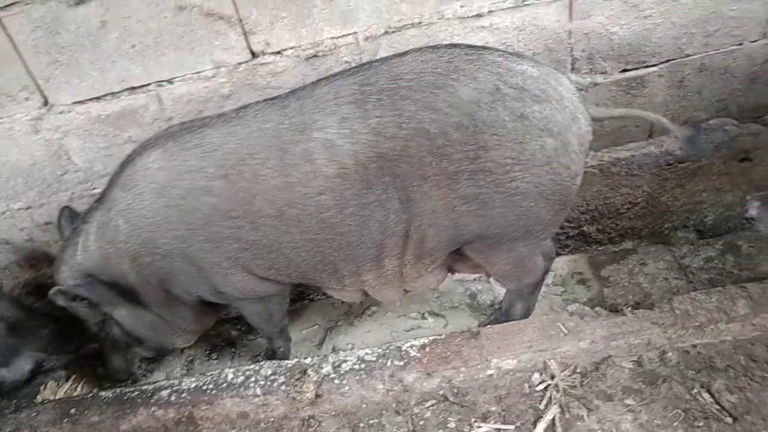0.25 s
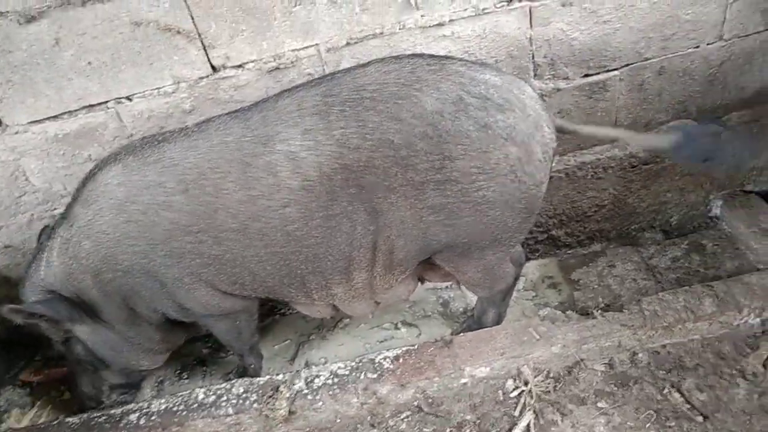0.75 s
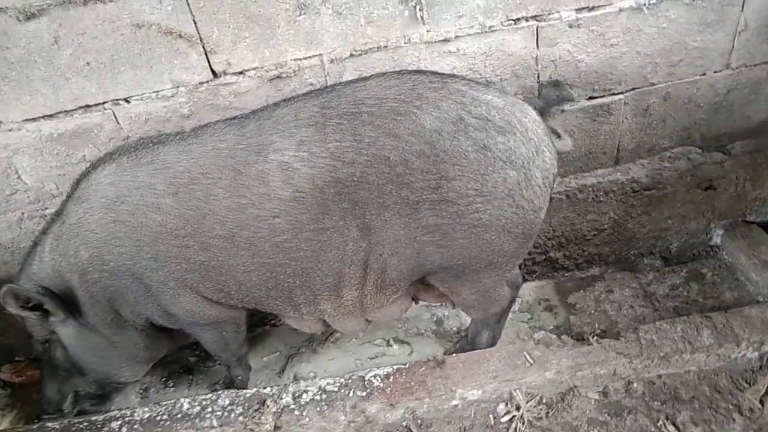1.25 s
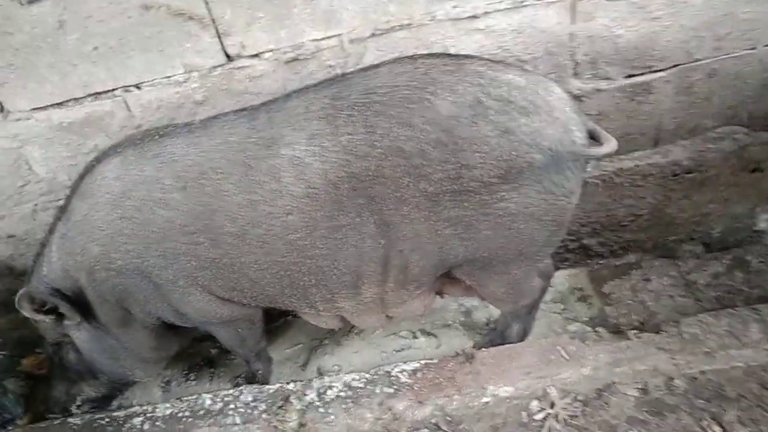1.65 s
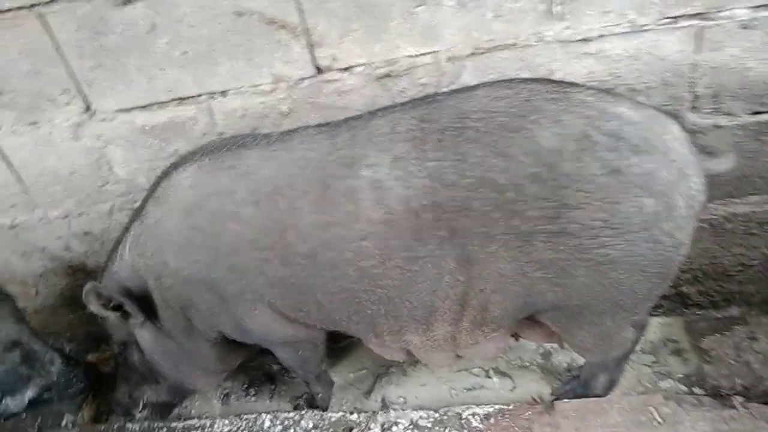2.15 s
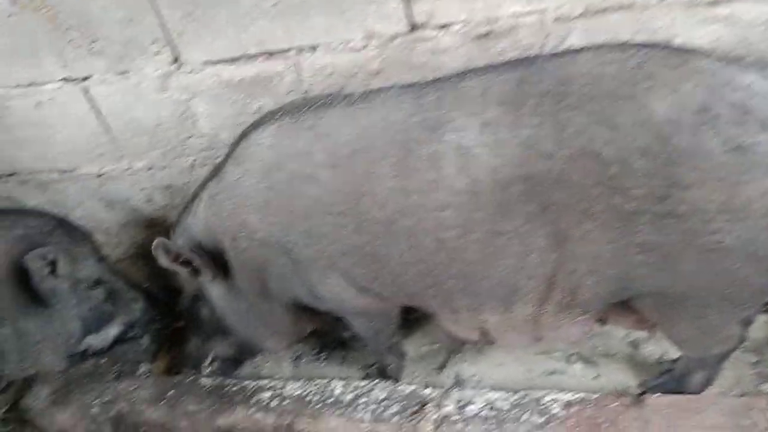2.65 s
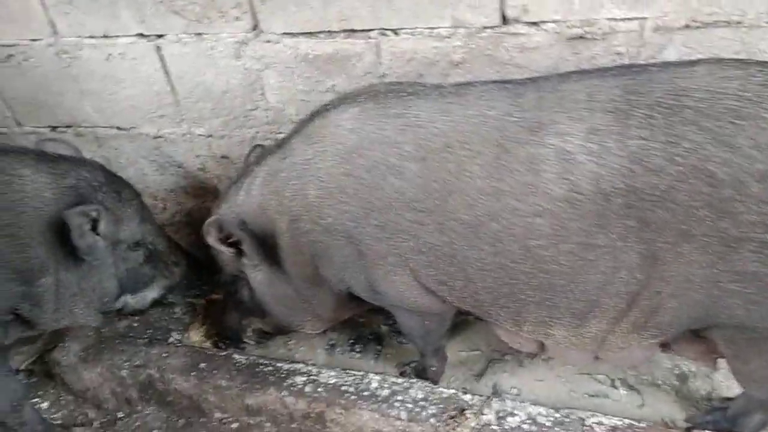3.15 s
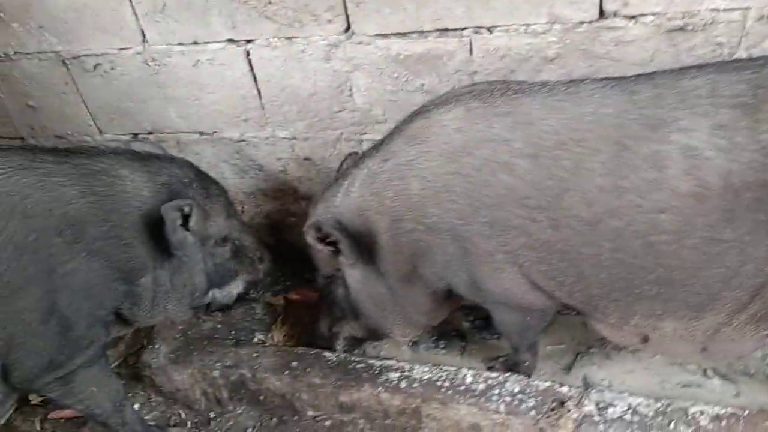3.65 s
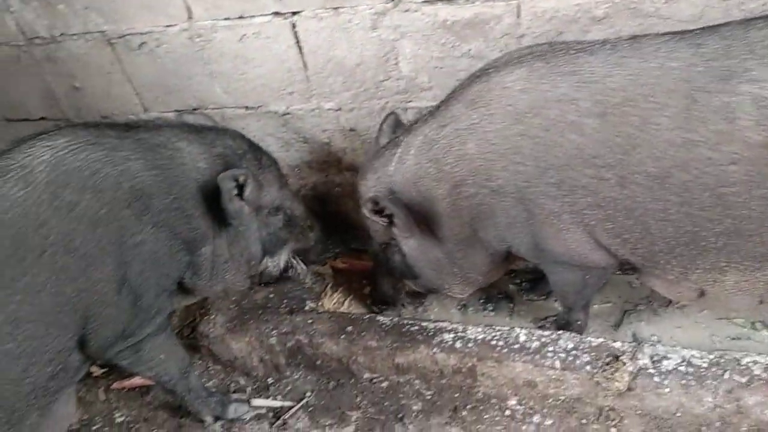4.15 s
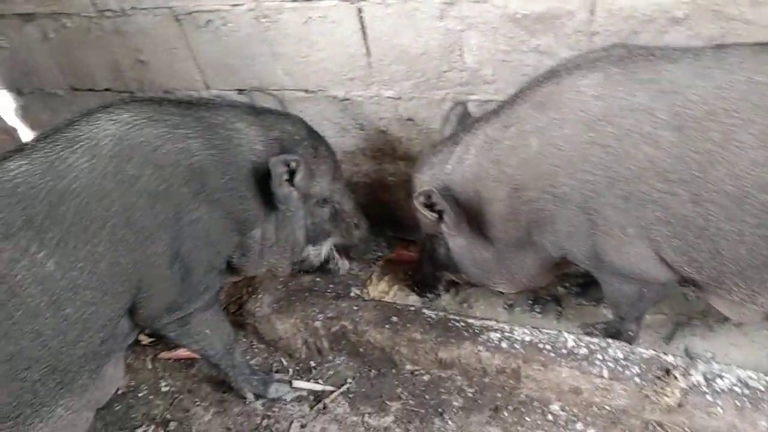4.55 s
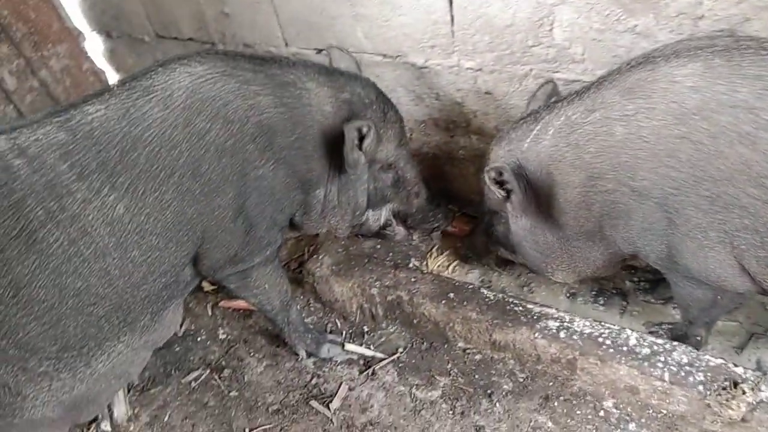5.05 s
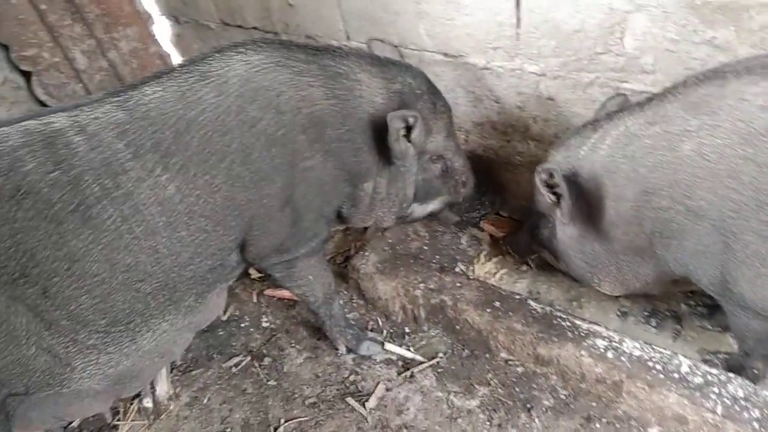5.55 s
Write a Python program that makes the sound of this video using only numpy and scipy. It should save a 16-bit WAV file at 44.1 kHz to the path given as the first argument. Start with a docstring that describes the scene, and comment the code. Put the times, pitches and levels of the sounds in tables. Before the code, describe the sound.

Wet chomps, lip smacks and slurps come steadily from two pigs eating mash, with a few dry clicks and knocks late on.

```python
"""Two pigs chew wet feed from a concrete trough, about three mouthfuls a second.
Bursting films and bubbles make the mash crackle, squelch and slosh; parting lips excite the mouth's
cavity resonance, juice squeaks between the teeth, slurps sink in pitch and air pockets plop.
The block walls of the pen reverberate briefly over a quiet yard. Late on, dry clicks and a few
knocks sound close by."""
import sys
import numpy as np
from scipy import signal
from scipy.fft import rfft, irfft, next_fast_len
from scipy.io import wavfile
from scipy.ndimage import uniform_filter1d

SR = 44100
rng = np.random.default_rng(int(sys.argv[2]) if len(sys.argv) > 2 else 0)


def inscribe(sig):
    """Save sig as 16-bit PCM at rate SR to the path in sys.argv[1].

    A 1-D sig is mono; a 2-D sig holds one channel per row.
    Samples are clipped to [-1, 1] before scaling.
    """
    pcm = np.round(np.clip(np.atleast_2d(sig).T, -1, 1) * 32767)
    wavfile.write(sys.argv[1], SR, pcm.astype(np.int16))


N = 256030
TIME = np.arange(N) / SR

# jaw strokes: (time [s], length [s], crackle level [dB], squelch level [dB], slosh level [dB],
# spray level [dB], mouth resonance [Hz])
JAW_STROKES = [(0, 0.099, -44.5, -86, -77, -53, 2260), (.11, 0.071, -38.5, -53.5, -70, -42.5, 2500),
               (0.226, 0.048, -38.5, -54.5, -59.5, -41.5, 3350),
               (0.411, 0.13, -37.5, -45, -60, -37.5, 2380), (0.651, 0.051, -38.5, -57, -69, -47, 1800),
               (0.703, 0.17, -41, -46.5, -51.5, -43.5, 3000), (0.9, 0.11, -36.5, -46, -69, -45.5, 2240),
               (1.08, 0.041, -39, -50, -54, -53.5, 1970), (1.156, 0.13, -42, -45.5, -76, -46, 2700),
               (1.331, 0.028, -36.5, -43.5, -62, -45.5, 2330), (1.377, 0.14, -44, -44, -49.5, -44, 2730),
               (1.619, 0.069, -48, -72, -70, -52.5, 3030), (1.659, .05, -40.5, -45, -56.5, -52, 2600),
               (1.8, 0.062, -54.5, -63, -70, -76, 2940), (1.9, 0.09, -41, -44.5, -62, -43.5, 3220),
               (2.004, 0.026, -37.5, -44.5, -67, -49, 1960), (2.122, 0.094, -36, -42.5, -47.5, -40, 2400),
               (2.269, 0.054, -43.5, -49.5, -64, -71, 2450), (2.365, 0.058, -42, -45.5, -67, -48, 2700),
               (2.449, 0.073, -41, -45, -79, -47, 2540), (2.576, 0.054, -31.5, -40, -43.5, -37, 2600),
               (2.647, 0.16, -56, -45, -57, -43, 2300), (2.824, 0.071, -38, -43, -45, -40.5, 2370),
               (2.941, 0.13, -39, -48.5, -55.5, -46, 2500), (3.065, 0.17, -44, -46, -52.5, -42, 2870),
               (3.341, 0.077, -38.5, -40.5, -44, -52.5, 1900), (3.397, 0.093, -45, -43, -44, -42.5, 2220),
               (3.496, 0.028, -34, -41.5, -61, -38, 2960), (3.64, 0.046, -44, -85, -82, -53, 2900),
               (3.669, 0.1, -44, -45, -43.5, -41.5, 2920), (3.798, 0.013, -35, -42, -48.5, -41.5, 3260),
               (3.951, 0.061, -38, -42.5, -47.5, -36.5, 3100),
               (4.072, 0.052, -49.5, -57.5, -53.5, -47.5, 2640),
               (4.216, 0.076, -43.5, -50, -49.5, -49, 2820), (4.276, 0.16, -40.5, -44.5, -51, -42.5, 2430),
               (4.534, .09, -39, -42.5, -58.5, -43, 2450), (4.632, 0.14, -41, -48, -86, -49.5, 2500),
               (4.806, 0.16, -42.5, -46, -46.5, -46.5, 2300), (5.109, 0.024, -38.5, -45, -62, -62, 2620),
               (5.125, 0.059, -35, -38.5, -45.5, -40, 2220), (5.216, 0.044, -41, -44, -41.5, -62, 2050),
               (5.325, 0.037, -55, -49, -44.5, -65, 2000), (5.404, .09, -41.5, -42, -43.5, -49, 2050),
               (5.53, 0.024, -40, -44.5, -45, -51, 2460), (5.58, 0.11, -42.5, -44.5, -81, -61, 1930),
               (5.705, 0.064, -40, -41, -47, -48, 2080)]
# spectrum of fine spray: (frequency [Hz], relative level [dB])
SPRAY_SPECTRUM = [(2500, -21), (4300, -5.5), (5300, -2.5), (6600, -4.5), (8000, -7), (10300, -11.5),
                  (11800, -21), (16000, -24)]


def amp(db):
    """Amplitude ratio of a level in decibels."""
    return 10 ** (np.asarray(db) / 20)


def unit(x):
    """Normalisation to rms 1."""
    return x / np.sqrt(np.mean(x ** 2) + 1e-20)


def burst(x, span_s=.032):
    """Energy normalisation: a transient gets the energy of rms 1 held for span_s."""
    return x / np.linalg.norm(x) * np.sqrt(span_s * SR)


def along(points, hz):
    """Interpolation of (frequency [Hz], value) points on a logarithmic frequency axis."""
    frequencies, values = np.transpose(points)
    return np.interp(np.log(hz + 1), np.log(frequencies), values)


def add(track, start_s, x):
    """Superposition of x on the track from start_s."""
    start = max(round(start_s * SR), 0)
    track[start:start + len(x)] += x[:max(N - start, 0)]


def coloured(x, spectrum, size=4096):
    """Minimum-phase filtering: folding the cepstrum gives a causal response with this spectrum."""
    gain = amp(along(spectrum, np.fft.rfftfreq(size, 1 / SR)))
    cepstrum = irfft(np.log(gain))
    cepstrum[1:size // 2] *= 2
    cepstrum[size // 2 + 1:] = 0
    response = irfft(np.exp(rfft(cepstrum)))
    return signal.fftconvolve(x, response)[:len(x)]


def resonance(x, hz, q):
    """Forced response of a second-order resonator with peak gain 1."""
    return signal.lfilter(*signal.iirpeak(hz, q, SR), x)


def yard():
    """Ambient noise: a faint, stationary random signal with a shaped spectrum."""
    # background spectrum: (frequency [Hz], relative level [dB])
    spectrum = [(20, -6), (40, 4), (54, 12.5), (75, 5.5), (180, -12.5), (310, -23), (450, 14), (1000, -30),
                (2500, -3.5), (5000, 6.5), (9000, -11.5), (16000, -13)]
    return amp(-62) * unit(coloured(rng.standard_normal(N), spectrum))


def pen_reverberation(x, segments=24, delay_s=.004):
    """Diffuse reflection from close walls; a fresh tail for each segment stands for the moving heads."""
    # decay in the pen: (frequency [Hz], reverberation time T60 [s])
    decay_times = [(150, 0.26), (320, 0.27), (550, 0.28), (2500, 0.33), (7000, 0.15), (15000, 0.097)]
    out = np.zeros(N)
    for k in range(segments):
        hz, t, noise = signal.stft(rng.standard_normal(SR // 3), SR, nperseg=256)
        decay = amp(-60 * t / along(decay_times, hz)[:, None])
        tail = signal.istft(noise * decay, SR, nperseg=256)[1]
        start, end = k * N // segments, (k + 1) * N // segments
        add(out, start / SR + delay_s, signal.fftconvolve(x[start:end], tail / np.linalg.norm(tail)))
    return out


def clicks(snap_hz=1000, db_per_octave=17, edge_hz=7000, knock_hz=394, thump_hz=150):
    """Impact excitation of damped modes: a one-cycle snap with a bright edge, a knock, a dull thump."""
    # close contacts: (time [s], snap gain [dB], knock gain [dB])
    contacts = [(4.2027, -23, -47), (4.2288, -26, -41), (4.336, -26, -38), (4.3656, -16, -46),
                (4.3916, -15, -50), (4.4245, -14.5, -50), (4.5328, -15, -52), (4.8254, -14, -51),
                (4.8372, -21, -26.5), (4.8498, -18.5, -29), (4.8598, -19, -50), (4.8734, -17, -33),
                (4.8915, -21.5, -31), (4.9315, -14, -25.5), (4.9727, -14.5, -36), (5.2845, -7.5, -11),
                (5.3289, -9.5, -18.5), (5.5003, -10.5, -19.5)]
    out, t = np.zeros(N), np.arange(SR // 25) / SR
    ring = lambda hz, life: np.sin(2 * np.pi * hz * t) * np.exp(-t / life)
    highpass = signal.butter(2, 260, "high", fs=SR)
    knock = ring(knock_hz, .0031) * (1 - np.exp(-t / .0018))
    thump = amp(-19) * ring(thump_hz, .01)
    for start, snap_db, knock_db in contacts:
        # lighter contacts are briefer and higher
        hz = min(snap_hz * 2 ** (-snap_db / db_per_octave), SR / 4)
        snap = amp(snap_db) * ring(hz * np.exp(.1 * rng.standard_normal()), .65 / hz)
        # harder contacts gain body, while their bright edge stays about the same
        edge = min(2 * amp(snap_db), amp(-11)) * ring(edge_hz, .00006)
        crack = signal.lfilter(*highpass, snap - edge)
        add(out, start, crack + amp(knock_db) * (knock + thump))
    return out


def plops(attack_s=.0029, decay_s=.0047):
    """Damped oscillation: an air pocket collapses under a snout with a dull, short note."""
    # air pockets in the mash: (time [s], frequency [Hz], gain [dB])
    pockets = [(.02, 517, -45.5), (.082, 510, -45), (0.163, 497, -39.5), (.238, 480, -34.5),
               (0.256, 290, -42), (0.516, 390, -51), (0.754, 260, -33), (0.852, 297, -40),
               (1.422, 300, -33.5), (2.121, 168, -29.5), (2.2, 251, -24.5), (2.32, 232, -37.5),
               (2.865, 350, -44), (3.712, 270, -34), (4.041, 250, -22.5), (4.302, 226, -31),
               (4.601, 206, -41), (5.143, 413, -26), (5.252, 378, -26.5), (5.386, 500, -38)]
    out, t = np.zeros(N), np.arange(SR // 10) / SR
    envelope = (1 - np.exp(-t / attack_s)) * np.exp(-t / decay_s)
    for start, hz, db in pockets:
        add(out, start, amp(db) * np.sin(2 * np.pi * hz * t) * envelope)
    return out


def bubbles(starts, hz, strength, cycles):
    """Bubble resonance: small cavities open softly and ring down with a time constant of `cycles`."""
    life = (cycles / hz)[:, None]
    t = np.arange(int(min(7 * np.median(life), .06) * SR) + 2) / SR
    envelope = t / life * np.exp(-t / life) * (1 - t / t[-1])
    rings = np.sin(2 * np.pi * hz[:, None] * t) * envelope * strength[:, None] / np.sqrt(life)
    index = (starts[:, None] * SR).astype(int) + np.arange(len(t))
    return np.bincount(index.ravel(), rings.ravel())


def slurps(bubbles_per_s=600):
    """Resonance falls as volume grows: feed sucked into an opening cavity bubbles down in pitch."""
    # sucks: (time [s], length [s], first frequency [Hz], last frequency [Hz], level [dB])
    sucks = [(0.411, .06, 1760, 1080, -43.5), (0.68, .031, 1560, 1580, -44),
             (0.978, .06, 1530, 1060, -47.5), (1.104, 0.026, 850, 485, -45.5), (1.349, .04, 1790, 905, -43),
             (1.372, .065, 990, 565, -42), (1.908, .025, 1390, 835, -65), (2.108, .11, 1530, 650, -44.5),
             (2.601, 0.046, 1430, 827, -39), (2.852, 0.036, 1220, 726, -39), (3.097, .09, 1200, 460, -48),
             (3.349, .09, 1630, 710, -44), (3.677, .06, 950, 657, -45), (3.973, .022, 1060, 990, -37.5),
             (4.57, .042, 1550, 923, -41.5), (5.135, .035, 1570, 1300, -34)]
    out = np.zeros(N)
    for start, length, first_hz, last_hz, db in sucks:
        count = int(length * bubbles_per_s) + 2
        progress = (np.arange(count) + rng.random(count)) / count
        # the further the cavity opens, the more unevenly it does so
        scatter = .06 + .24 * np.log(first_hz / last_hz)
        hz = first_hz * (last_hz / first_hz) ** progress * np.exp(scatter * rng.standard_normal(count))
        rush = bubbles(progress * length, hz, amp(4 * rng.standard_normal(count)), cycles=2.6)
        add(out, start, amp(db) * unit(rush))
    return out


def tearing(swell_s, fade_s, rate, spread_db):
    """Shot noise: a wet film tears in a volley of tiny random snaps of total energy 1."""
    t = np.arange(SR // 8) / SR
    envelope = np.minimum(t / swell_s, 1) * np.exp(-np.maximum(t - swell_s, 0) / fade_s)
    impulses = (rng.random(len(t)) < rate / SR) * rng.choice([-1, 1], len(t))
    volley = impulses * amp(spread_db * rng.standard_normal(len(t))) * envelope
    return volley / np.linalg.norm(volley)


def squeaks():
    """Gap resonance: a jet of juice whistles between the teeth; a faster start brings a sooner end."""
    # jets of juice: (time [s], swell [s], frequency [Hz], level [dB])
    jets = [(0.439, 0.0052, 7300, -33), (.439, 0.0041, 9900, -37), (2.325, 0.015, 6700, -57),
            (3.682, 0.01, 7030, -28.5), (3.975, 0.011, 7200, -34), (3.975, 0.011, 9200, -40),
            (5.115, .005, 8300, -54), (5.178, 0.0061, 8400, -46), (5.25, 0.0071, 6100, -43.5),
            (5.431, .007, 8100, -47.5), (5.54, 0.012, 6200, -44)]
    out = np.zeros(N)
    for start, swell, hz, db in jets:
        jet = tearing(swell, fade_s=1.2 * swell, rate=5700, spread_db=5.5)
        whistle = resonance(resonance(jet, hz, q=11), hz, q=2)
        add(out, start, amp(db) * burst(whistle))
    return out


def smacks(teeth_hz=6330, leak_db=-13):
    """Source and filter: a film tearing between the lips rings the mouth; spray hisses in the teeth."""
    # lip and tongue smacks: (time [s], swell [s], level [dB], mouth resonance [Hz],
    # relative spray level [dB], relative snap gain [dB])
    partings = [(.017, 0.016, -38, 1600, -15, -5), (.236, 0.0065, -32.5, 3150, -8, -19),
                (.383, 0.012, -35, 2770, -2, -17), (.483, 0.011, -25, 3340, -18, 4),
                (.523, .011, -35.5, 3120, -3, -10), (.665, 0.02, -35, 1600, -11, -20),
                (.826, 0.019, -34, 2960, -4, 0), (.948, .02, -34, 1830, -7, -4),
                (1.137, 0.0089, -36.5, 1860, -28, -6), (1.169, 0.0073, -37.5, 3070, -7, -11),
                (1.482, 0.026, -37.5, 3720, -3, 1), (1.687, 0.013, -36.5, 2510, -13, -12),
                (1.838, 0.0047, -44, 3230, -18.5, -14), (1.918, 0.0059, -36.5, 3570, -3, -26),
                (1.938, 0.01, -34.5, 3180, -7, -11), (2.103, 0.011, -38, 1410, -23, -12),
                (2.388, 0.016, -39.5, 2450, -15, -16), (2.513, 0.011, -42.5, 1780, -20, -13),
                (2.566, 0.0085, -38.5, 2750, -6.5, 2), (2.604, 0.013, -30.5, 3500, -13, 2),
                (2.727, 0.02, -35, 2200, -3.5, 0), (2.786, 0.013, -31.5, 2230, -15, 3),
                (2.857, 0.013, -36, 1620, 0, -5), (2.953, 0.0093, -47.5, 2860, 0.5, -8),
                (3.03, 0.023, -33, 2870, -11.5, 1), (3.069, 0.017, -35.5, 3930, -15, -16),
                (3.226, 0.018, -38, 2460, -30, -5), (3.326, 0.012, -40.5, 2070, -28, -14),
                (3.394, 0.012, -33, 2020, -12, -8), (3.504, 0.005, -39.5, 3960, -7, -25),
                (3.791, 0.0058, -35.5, 3470, -11, -10), (3.973, .01, -30.5, 3220, -1, -5),
                (4.255, 0.012, -41.5, 3260, 5.5, -3), (4.585, 0.018, -37.5, 2970, -6, 2),
                (4.667, 0.012, -34.5, 2600, -10.5, -6), (4.954, 0.012, -42, 2070, 0, -13),
                (5.066, 0.0082, -49.5, 1980, -28, -22), (5.142, 0.0074, -27.5, 2450, -12, -31),
                (5.338, 0.01, -35.5, 2040, -35, -30), (5.428, 0.0049, -48.5, 1430, 5, -18),
                (5.627, 0.017, -35, 2050, -23, -39), (5.737, 0.012, -37.5, 2260, -24, -39)]
    # filter of the lips: (frequency [Hz], relative gain [dB])
    lip_spectrum = [(300, -34), (520, -16), (1000, -18), (1500, 2.5), (3300, 3), (4400, -7.5), (6000, -36),
                    (12000, -30.5)]
    out = np.zeros(N)
    for start, swell, db, mouth_hz, spray_db, snap_db in partings:
        film = tearing(swell, fade_s=.012, rate=3000, spread_db=3.5)
        ring = resonance(resonance(film, mouth_hz, q=5), mouth_hz, q=7)
        smack = coloured(amp(snap_db) * film + ring, lip_spectrum)
        jet = tearing(swell, fade_s=.0088, rate=2700, spread_db=1.5)
        gap_hz = teeth_hz * np.exp(.07 * rng.standard_normal())
        hiss = coloured(amp(leak_db) * jet + resonance(jet, gap_hz, q=9), SPRAY_SPECTRUM)
        add(out, start, amp(db) * (burst(smack) + amp(spray_db) * burst(hiss)))
    return out


def mouthing(x, depth_db):
    """Time-varying filtering: cheeks and tongue reshape the mouth, so narrow peaks come and go."""
    spectra = signal.stft(x, nperseg=512)[2]
    ripple = uniform_filter1d(rng.standard_normal(spectra.shape), 4, axis=0)
    ripple = uniform_filter1d(ripple, 8, axis=1)
    return signal.istft(spectra * amp(depth_db * unit(ripple)), nperseg=512)[1][:N]


def mouth_cavity(x, hz, leak_db=-13):
    """Cavity resonance: a crossfade between fixed mouth shapes follows the moving frequency hz."""
    # mouth shapes from wide to narrow: (resonance [Hz], quality factor [1])
    shapes = [(1600, 3.2), (2100, 3.7), (2700, 1.85), (3350, 1.03)]
    centres = [centre for centre, _ in shapes]
    weights = [np.interp(hz, centres, row) for row in np.eye(len(shapes))]
    ring = sum(weight * unit(resonance(x, centre, q)) for weight, (centre, q) in zip(weights, shapes))
    return unit(amp(leak_db) * x + ring)


def froth(spectrum, rate, median_hz, cycles, ripple_db):
    """A random pulse process: `rate` films and bubbles a second merge into a steady texture of rms 1."""
    count = int(rate * N / SR)
    strength = amp(2 * np.minimum(rng.exponential(size=count), 4))
    starts = rng.uniform(0, N / SR, count)
    hz = median_hz * np.exp(.4216 * rng.standard_normal(count))
    grains = np.pad(bubbles(starts, hz, strength, cycles), (0, N))[:N]
    texture = coloured(mouthing(grains, ripple_db), spectrum)
    # big and small bursts even out over a few hundredths of a second
    power = np.abs(uniform_filter1d(unit(texture) ** 2, SR // 32))
    return unit(texture / np.sqrt(power + .072))


def jaw_envelope(levels_db, timing):
    """Incoherent addition: strokes sum in power; each rises, sags as the jaw presses, then dies away."""
    lag, attack, sag, release = timing
    power = np.zeros(N)
    for (start, length, *_), db in zip(JAW_STROKES, levels_db):
        t = TIME - start - lag
        rise = np.clip(t / attack, 0, 1)
        fall_db = sag * np.clip(t, 0, length) + release * np.maximum(t - length, 0)
        power += (rise * amp(db - fall_db)) ** 2
    return np.sqrt(power)


def chewing(glide_s=.042):
    """Size sets pitch: thin films crackle and spit first, then small pockets squelch and big ones slosh."""
    # spectra of big pockets, small pockets and films: (frequency [Hz], relative level [dB])
    slosh_spectrum = [(60, -34), (130, -22.5), (190, -3), (310, -7.5), (420, -1), (600, 2.5), (900, -42),
                      (2000, -37)]
    squelch_spectrum = [(330, -31), (480, -8), (800, -1), (1300, -1.5), (1700, 4.5), (3500, -50)]
    crackle_spectrum = [(700, -55.5), (1200, -7), (1550, -4), (2400, -5.5), (3300, -1), (3900, -5),
                        (4500, -26.5), (6000, -33), (12000, -106)]
    # course of each part of a stroke: (lag [s], attack [s], sag [dB/s], release [dB/s])
    slosh_timing = (0.0094, 0.066, 16, 267)
    squelch_timing = (.008, .018, 25, 260)
    crackle_timing = (.001, .013, 22, 210)
    spray_timing = (.002, .014, 25, 230)
    starts, _, crackle_db, squelch_db, slosh_db, spray_db, stroke_hz = np.transpose(JAW_STROKES)
    # the mouth glides to a new shape with every stroke
    current_stroke = np.maximum(np.searchsorted(starts, TIME) - 1, 0)
    mouth_hz = uniform_filter1d(stroke_hz[current_stroke], int(glide_s * SR) + 1)
    slosh = froth(slosh_spectrum, rate=300, median_hz=330, cycles=1.8, ripple_db=4.5)
    squelch = froth(squelch_spectrum, rate=800, median_hz=950, cycles=2.8, ripple_db=5)
    crackle = froth(crackle_spectrum, rate=3000, median_hz=2400, cycles=1.4, ripple_db=3.8)
    spray = froth(SPRAY_SPECTRUM, rate=5000, median_hz=7500, cycles=.5, ripple_db=2.6)
    return (jaw_envelope(slosh_db, slosh_timing) * slosh
            + jaw_envelope(squelch_db, squelch_timing) * squelch
            + jaw_envelope(crackle_db, crackle_timing) * mouth_cavity(crackle, mouth_hz)
            + jaw_envelope(spray_db, spray_timing) * spray)


def scene():
    """Superposition in one channel: the yard, the pen's reverberation, close clicks and the pigs."""
    pigs = chewing() + smacks() + squeaks() + slurps() + plops()
    return (yard() + amp(-9.5) * pen_reverberation(pigs) + clicks() + pigs)[None]


def record(dry, low_hz=45, top_hz=16300):
    """Band limiting: a small microphone loses the deep bass and passes nothing above top_hz."""
    thin = signal.sosfilt(signal.butter(3, low_hz, "high", fs=SR, output="sos"), dry)
    size = next_fast_len(N + SR // 2)
    passband = np.fft.rfftfreq(size, 1 / SR) < top_hz
    return irfft(rfft(thin, size) * passband, size)[:, :N]


dry = scene()
out = record(dry)
inscribe(out)
```